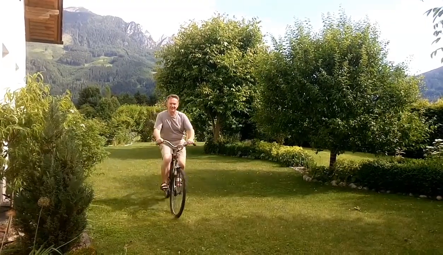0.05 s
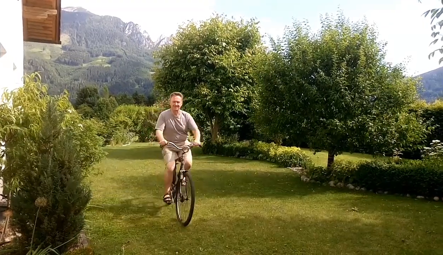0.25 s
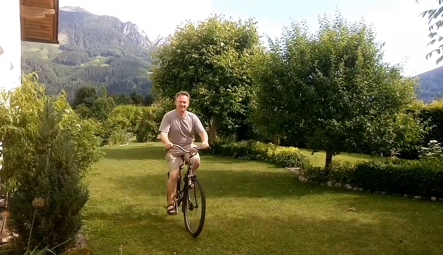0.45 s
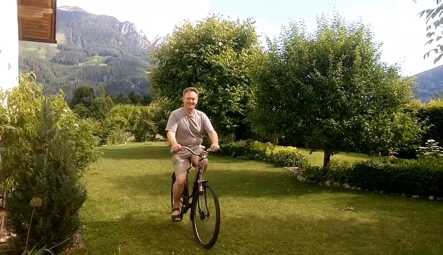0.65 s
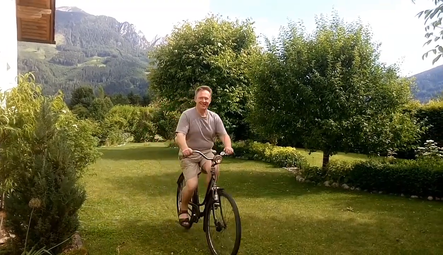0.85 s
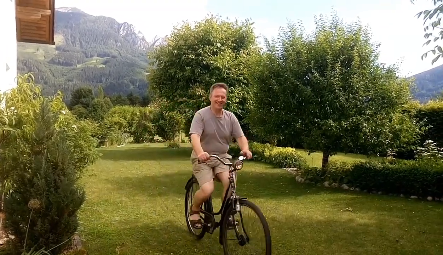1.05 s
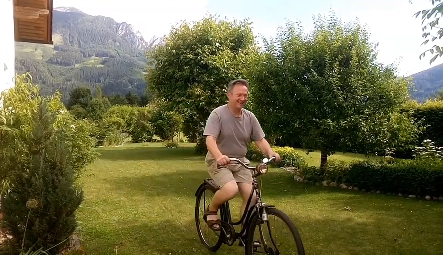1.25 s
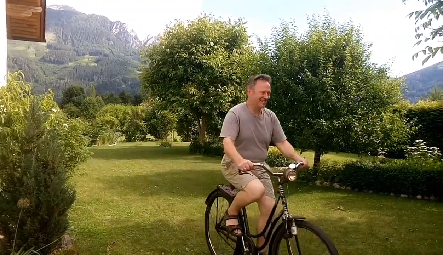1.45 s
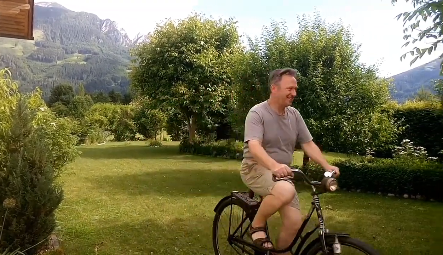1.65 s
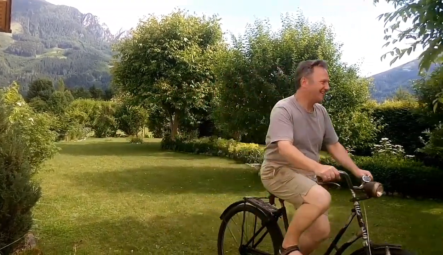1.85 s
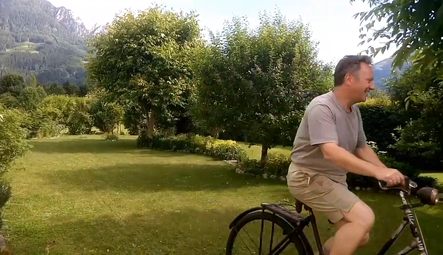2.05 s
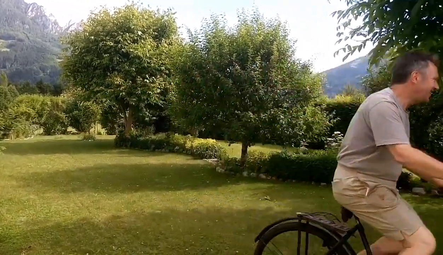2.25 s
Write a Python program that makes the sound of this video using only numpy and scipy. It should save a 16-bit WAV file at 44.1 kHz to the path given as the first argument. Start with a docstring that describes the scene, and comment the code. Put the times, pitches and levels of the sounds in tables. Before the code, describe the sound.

A bicycle bell rings close by in eight quick, bright strikes, then fades with a wavering metallic tone. The bike rolls across a lawn towards the microphone, tyres swishing faintly and loose parts rattling lightly over a low outdoor rumble.

```python
"""A low outdoor rumble, a faint hum and tyres swishing in grass; then a bicycle bell rings out close by.
The cyclist thumbs the lever and the clapper hits the dome eight times: pairs of modes beat, each blow
cracks, the works chatter and the lever clacks. Hedges and a house wall return Doppler-shifted echoes.
As the ring fades, loose parts rattle on the bicycle, which rolls across the lawn towards the microphone."""
import sys
import numpy as np
from scipy import signal
from scipy.fft import rfft, irfft
from scipy.io import wavfile
from scipy.ndimage import uniform_filter1d, map_coordinates

SR = 44100
rng = np.random.default_rng(int(sys.argv[2]) if len(sys.argv) > 2 else 0)


def wrap_up_sound(samples):
    """Save the sound to the file named by the first command line argument, as 16-bit audio."""
    columns = np.atleast_2d(samples).T
    # keep every value between -1 and 1, then stretch to whole-number steps
    tamed = np.clip(columns, -1, 1)
    steps = np.round(tamed * 32767).astype(np.int16)
    wavfile.write(sys.argv[1], SR, steps)


N = 101429

LEFT_LAG_S = .000408  # the bicycle's sound reaches the left channel this much later
SIDES = np.array([[.5], [-.5]])  # splits a left-minus-right amount between the channels
# blows of the clapper: t/s, ring/dB, sharpness/dB (drives the mechanism and the top modes)
STRIKES = [(0.2421, 0, 1.5), (0.406, -6.5, -5.5), (0.4704, -2, 2.5), (0.578, -5, 0.5), (.6078, -5, 0),
           (0.643, -3, -7.5), (.7191, -5, -0.5), (0.769, -2.5, -1.5)]


def undb(db):
    """Decibels to gain."""
    return 10 ** (np.asarray(db) / 20)


def clock():
    """Time of every sample in seconds."""
    return np.arange(N) / SR


def curve(points):
    """Gain envelope through points of t/s, level/dB."""
    return undb(np.interp(clock(), *np.array(points).T))


def coloured(x, colour):
    """EQ through points of f/Hz, level/dB; white noise keeps its power."""
    hz, db = np.array(colour).T
    gain = undb(np.interp(np.log(np.fft.rfftfreq(N, 1 / SR) + 1), np.log(hz), db))
    return irfft(rfft(x) * gain / np.sqrt(np.mean(gain ** 2)), N)


def noise(colour, channels=2):
    """Uncorrelated coloured noises of rms 1."""
    return coloured(rng.standard_normal((channels, N)), colour)


def walk(per_s):
    """Smooth random modulation with a spread of 1."""
    step = int(SR / per_s)
    drift = uniform_filter1d(np.repeat(rng.standard_normal(N // step + 1), step), step)[:N]
    return drift / drift.std()


def decay(times, dbs, t60_s):
    """Envelope of blows whose energies add up and die away."""
    energy = np.zeros(N)
    np.add.at(energy, (np.asarray(times) * SR).astype(int), undb(dbs) ** 2)
    pole = np.exp(-2 * np.log(1000) / (t60_s * SR))
    return np.sqrt(signal.lfilter([1], [1, -pole], energy + 1e-24))


def mode(hz, times, dbs, t60_s, contact_s=0.0007):
    """One complex ringing mode; a blow turns its phase by as much as it outweighs the old ring."""
    size = decay(times, dbs, t60_s)
    hits = (np.asarray(times) * SR).astype(int)
    turn = np.zeros(N)
    turn[hits] = rng.choice([-1, 1], len(hits)) * np.arccos(np.clip(size[hits - 1] / size[hits], 0, 1))
    pole = np.exp(-1 / (contact_s * SR))  # a blow takes time to build up the mode
    ring = signal.lfilter([(1 - pole) ** 2], np.poly([pole, pole]), size * np.exp(1j * np.cumsum(turn)))
    return ring * np.exp(2j * np.pi * hz * clock())


def delayed(x, late_s):
    """Delay line whose time may glide."""
    return map_coordinates(x, [(clock() - late_s) * SR], order=5)


def outdoors(rumble_db=-54.5, flicker_db=1.5, pan_db=3.5, wide_hz=600, hiss_db=-70.5):
    """A wavering rumble, nearly mono in the bass and leaning left, with faint microphone hiss."""
    rumble_colour = [(15, -42), (25, -17), (43, -5), (86, 2.5), (107, -5), (134, 1.5), (167, -6.5),
                     (182, -7.5), (270, -19.5), (316, -14.5), (381, -21.5), (422, -17.5), (546, -23.5),
                     (928, -22.5), (1500, -26.5), (1950, -41), (3300, -120)]  # outdoor air: f/Hz, level/dB
    hiss_colour = [(1000, -9.5), (2500, 0.5), (6500, -25.5), (8200, -21), (13500, -7.5), (14900, 7),
                   (15500, 6), (15900, -42)]  # microphone self-noise: f/Hz, level/dB
    mid, side = noise(rumble_colour)
    highpass = signal.butter(1, wide_hz, "high", fs=SR, output="sos")
    side = 0.13 * side + signal.sosfilt(highpass, side) / 2
    gain = undb(rumble_db + flicker_db * walk(8.42) + pan_db * SIDES)
    return np.array([mid + side, mid - side]) * gain + undb(hiss_db) * noise(hiss_colour)


def hum(trim_db=-3, waver_db=2, waver_rad=0.55):
    """A few low tones waver in the distance."""
    tones = [(53.8, -65), (86.1, -59.5), (129.2, -61.5), (156.1, -64.5)]  # partials of the hum: f/Hz, level/dB
    out = 0
    for hz, db in tones:
        peak = np.sqrt(2) * undb(db + trim_db + waver_db * walk(4))
        out += peak * np.sin(2 * np.pi * hz * clock() + waver_rad * walk(4.13))
    return out


def bike_noise(colour):
    """Stereo noise from the bicycle: half direct and later on the left, half by scattered paths."""
    source = noise(colour, channels=1)[0]
    direct = np.array([np.roll(source, int(LEFT_LAG_S * SR)), source])
    return (direct + noise(colour)) / np.sqrt(2)


def tyres(flicker_db=1):
    """Tyres brush the grass, swelling a little as the bicycle comes near."""
    colour = [(300, 1), (1000, -6.5), (2000, -3.5), (3200, -1.5), (4500, -3), (6500, 0.5), (8200, -19.5),
              (12000, -23)]  # swish of the grass: f/Hz, level/dB
    swell = [(0, -60), (.8, -59), (1.3, -56), (1.65, -57.5), (1.95, -56.5), (2.3, -57)]  # envelope of the swish: t/s, level/dB
    return bike_noise(colour) * curve(swell) * undb(flicker_db * walk(35.66))


def dome(treble_hz=12000, shimmer_rad=0.44, sway_rad=.6):
    """The clapper feeds five pairs of modes; neighbours beat, and swell as the bell moves."""
    modes_hz = [2335, 2428, 5515.5, 5593, 9338, 9420, 13935, 14030, 15000, 15125]  # dome modes, pair by pair: f/Hz
    # the same modes: level/dB, t60/s, left minus right level/dB, left phase lead/rad
    modes = [(-26, 2.8, 1.5, -1.06), (-24, 3.16, -2, -1.36), (-13.5, 1.5, -7.5, -0.18),
             (-3.5, 1.35, 0, -0.17), (-20, 0.56, 3.5, 2.76), (-17, 0.34, 11, 1.7), (-15, .18, -1, -1.3),
             (-11.5, 0.14, 3.5, 0.45), (-17, 0.14, -15.5, 0), (-18, 0.16, 6.5, 0)]
    low_swell = [(.25, 0), (.68, 2), (.75, -11), (.79, 0), (.88, -3), (1.03, 2), (1.14, 0), (1.18, -12),
                 (1.21, -1), (1.26, -5), (1.32, 1), (1.37, -15), (1.43, 0), (1.51, -10), (1.62, -1),
                 (1.81, -13), (1.92, -1), (2.25, 2)]  # envelope of the lowest pair: t/s, level/dB
    low_balance = [(.25, -8.5), (.38, -4), (.47, 2), (.85, -1), (1.05, 7), (1.65, 4.5), (1.92, -7.5),
                   (2.15, 0.5)]  # tilt of the lowest pair: t/s, upper minus lower mode/dB
    mid_swell = [(.25, -4), (.31, 2), (.41, -4), (.47, -2), (.55, 2), (.59, -2), (.67, 3), (.76, -4),
                 (.83, 1), (.92, -1), (1.22, -6), (1.6, -6)]  # envelope of the second pair: t/s, level/dB
    mid_pan = [(.25, -3.5), (.45, 0.5), (.68, -8), (.82, 1.5), (.92, 6.5), (1.3, -4)]  # pan of the second pair: t/s, left minus right/dB
    high_swell = [(.25, -4), (.42, -6), (.51, 4.5), (.6, -5.5), (.66, 6.5), (.71, -2.5), (.78, 0.5),
                  (.95, -0.5)]  # envelope of the third pair: t/s, level/dB
    times, ring_db, sharp_db = np.array(STRIKES).T
    low, tilt = curve(low_swell), np.sqrt(curve(low_balance))
    mid = curve(mid_swell) * curve(mid_pan) ** SIDES
    high = curve(high_swell)
    swells = [low / tilt, low * tilt, mid, mid, high, high, 1, 1, 1, 1]
    out = 0
    for hz, (db, t60_s, pan_db, lead_rad), swell in zip(modes_hz, modes, swells):
        ring = mode(hz, times, db + (sharp_db if hz > treble_hz else ring_db), t60_s)
        if hz > treble_hz:
            ring *= np.exp(1j * shimmer_rad * walk(30))
        stereo_phase = SIDES * (lead_rad + sway_rad * walk(6))
        stereo = undb(SIDES * pan_db) * np.exp(1j * stereo_phase)
        out += (swell * ring * stereo).real
    return out


def clapper(crack_db=-2, chatter_db=-22):
    """Each blow lands with a bright crack and leaves the works chattering."""
    crack_colour = [(900, -54), (1800, -20.5), (3300, -47.5), (4200, 2), (5000, -24.5), (6100, 6),
                    (6950, -6), (8000, -34), (10600, -33.5), (12600, -33.5), (14100, 8), (15200, 1.5),
                    (16000, -28)]  # impact on the dome: f/Hz, level/dB
    chatter_colour = [(900, -23), (1400, -17.5), (1850, -9.5), (3000, -10), (3500, -16), (4300, -6.5),
                      (5000, -6.5), (6100, 0.5), (6950, -3), (8000, -23.5), (10600, -16.5), (12400, -45.5),
                      (14200, -9), (15200, -9), (16000, -44.5)]  # shaken works: f/Hz, level/dB
    times, _, sharp_db = np.array(STRIKES).T
    bursts = rng.standard_normal((2, N)) * decay(times, sharp_db + crack_db, t60_s=0.013)
    tails = decay(times, sharp_db + chatter_db, t60_s=0.21)
    chatter = noise(chatter_colour) * tails * undb(2 * walk(250))
    return coloured(bursts, crack_colour) + chatter


def lever(kick_db=-14.5):
    """The lever rings briefly with each blow on the dome and clacks just after most of them."""
    clacks = [(0.258, 2), (.4900, -10), (0.5919, 3.5), (0.6203, 5), (0.6589, -5), (0.7348, -12),
              (0.786, -6.5)]  # knocks of the lever and its gear: t/s, level/dB
    modes = [(4140, -22, .035), (4420, -19, .035), (6230, -23, .025), (6860, -21, .025)]  # lever resonances: f/Hz, level/dB, t60/s
    strike_times, _, sharp_db = np.array(STRIKES).T
    kicks = np.column_stack([strike_times, sharp_db + kick_db])
    times, hit_db = np.vstack([clacks, kicks]).T
    return sum(mode(hz, times, db + hit_db, t60_s) for hz, db, t60_s in modes).real


def garden(bell, speed_m_s=2.5, abreast_s=2.45, side_m=2.0, echoes=20, echo_db=-26.5, t60_s=0.64):
    """The approaching bell, direct and off hedges and wall, each path with its own Doppler shift."""
    sound_m_s, echo_top_hz = 343, 12000
    first_echo_s, spread_s = .008, 0.082
    since = clock() - STRIKES[2][0]  # travel times are counted from the third blow
    distance = np.hypot(speed_m_s * (clock() - abreast_s), side_m)
    late_s = (distance - np.interp(0, since, distance)) / sound_m_s
    out = np.array([delayed(bell[0], late_s + LEFT_LAG_S), delayed(bell[1], late_s)]) / distance
    dull = signal.sosfilt(signal.butter(2, echo_top_hz, fs=SR, output="sos"), bell)
    for k, (depth, jitter) in enumerate(rng.random((echoes, 2))):
        lag_s = first_echo_s + spread_s * depth
        bearing = np.pi * (k + jitter) / echoes
        doppler = speed_m_s * np.cos(bearing) / sound_m_s
        gain = undb(echo_db) * np.exp(-np.log(1000) * lag_s / t60_s)
        out[k % 2] += gain * delayed(dull[k % 2], lag_s - doppler * since)
    return out


def rattle(level_db=-48, rise_s=0.002):
    """Loose parts of the bicycle shake in short, grainy bursts."""
    jolts = [(1.746, -5.5), (1.8127, -0.5), (1.865, -7), (1.909, -1.5), (1.9602, 1), (2.106, -3.5),
             (2.215, -3.5), (2.273, 4)]  # shakes of the bicycle: t/s, level/dB
    colour = [(1500, -13), (3500, -4.5), (4500, -1.5), (5200, -10), (6100, 6.5), (6900, -4), (8200, -23),
              (13000, -35)]  # loose parts: f/Hz, level/dB
    times, dbs = np.array(jolts).T
    shakes = uniform_filter1d(decay(times, dbs + level_db, t60_s=0.18), int(rise_s * SR) + 1)
    return bike_noise(colour) * shakes * undb(1.6 * walk(250))


def scene():
    """The bell in the garden, over the rolling bicycle and the outdoor bed."""
    bell = dome() + clapper() + lever()
    return garden(bell) + tyres() + rattle() + outdoors() + hum()


def record(dry, top_hz=16100):
    """A steep low-pass cuts the very top."""
    return signal.sosfilt(signal.ellip(8, .2, 80, top_hz, fs=SR, output="sos"), dry)


dry = scene()
out = record(dry)
wrap_up_sound(out)
```